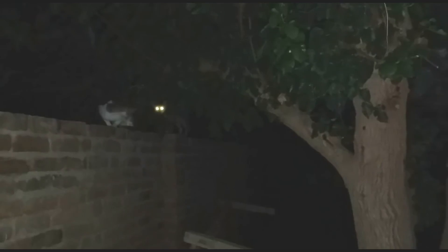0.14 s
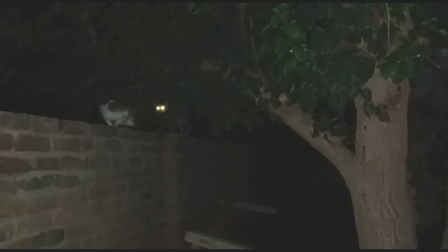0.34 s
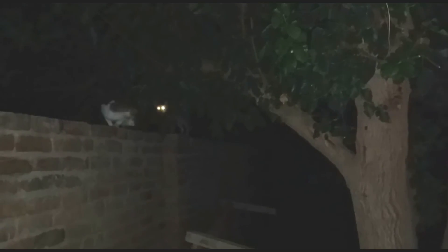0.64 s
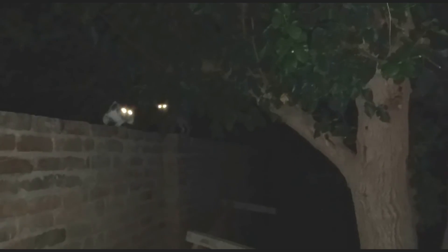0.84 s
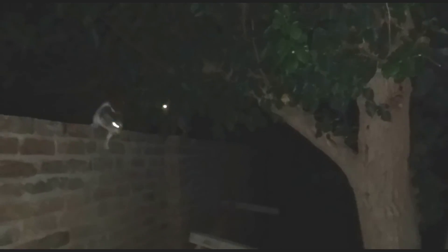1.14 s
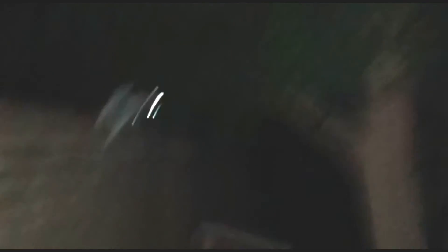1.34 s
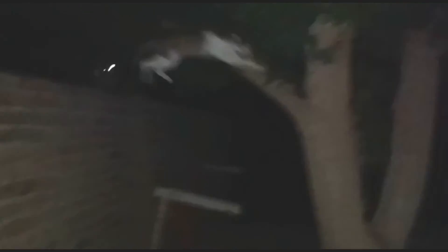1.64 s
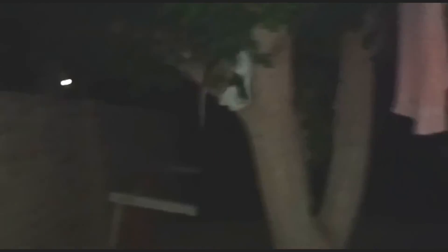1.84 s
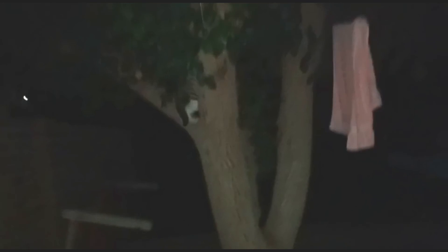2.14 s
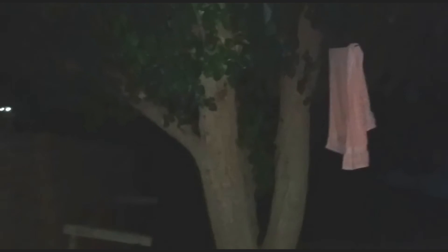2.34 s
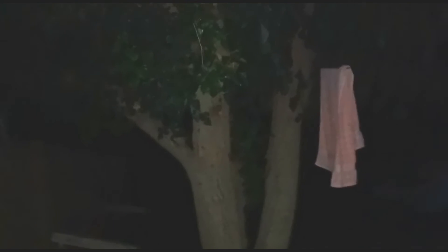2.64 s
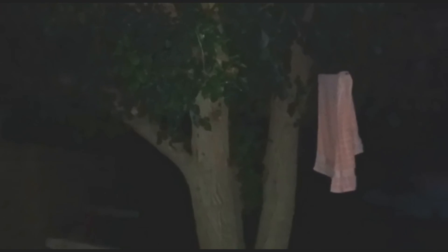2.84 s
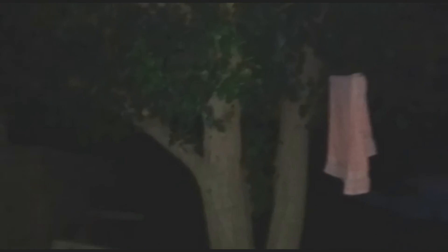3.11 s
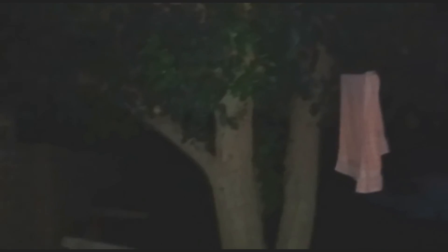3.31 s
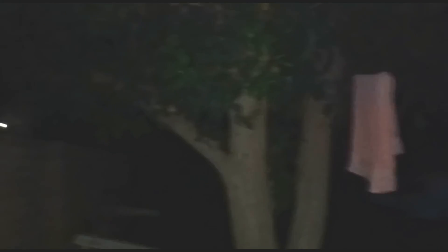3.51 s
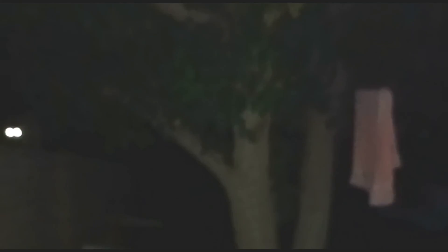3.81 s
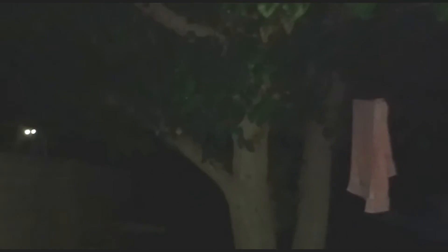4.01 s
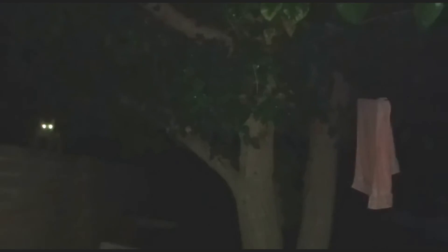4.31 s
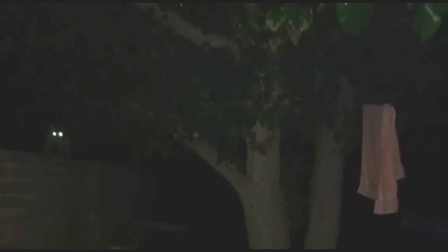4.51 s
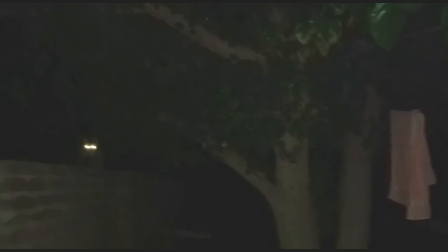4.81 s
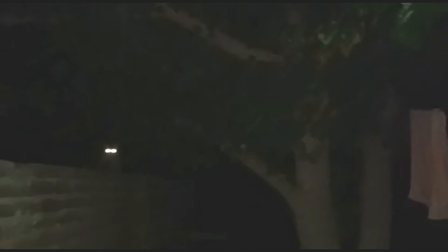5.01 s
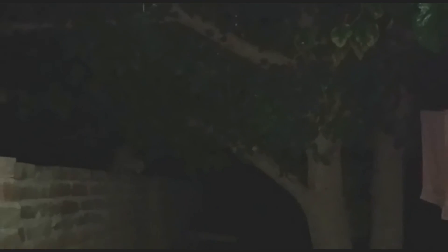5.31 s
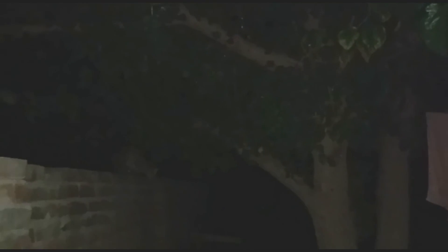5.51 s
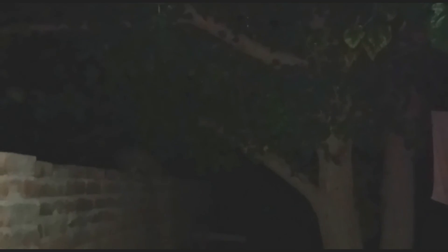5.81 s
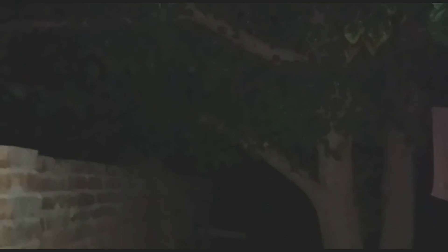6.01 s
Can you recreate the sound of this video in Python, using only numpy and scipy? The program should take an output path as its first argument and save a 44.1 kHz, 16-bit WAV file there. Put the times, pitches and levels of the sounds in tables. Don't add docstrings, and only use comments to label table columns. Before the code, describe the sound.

Handheld stereo outdoors: within the first second a cat's yowl slides upward and cracks into a raspy, piercing screech, with a short reflection off the walls. Soft woody thumps, scraping claws, leafy swishes and small snaps follow as the cat climbs a tree. Around three seconds a grunt swells into a snarling growl and fades. A wavering low hum, cricket chirps and distant howling dog continue behind.

```python
import sys
import numpy as np
from scipy import signal
from scipy.fft import rfft, irfft
from scipy.io import wavfile
from scipy.ndimage import uniform_filter1d, minimum_filter1d, map_coordinates

SR = 44100
rng = np.random.default_rng(int(sys.argv[2]) if len(sys.argv) > 2 else 0)


def dump_mix(stems):
    frames = np.atleast_2d(stems).T
    limited = np.clip(frames, -1, 1)
    pcm = np.round(limited * 32767).astype(np.int16)
    wavfile.write(sys.argv[1], SR, pcm)


def linear_from_db(decibels):
    return 10 ** (np.asarray(decibels, float) / 20)


N = 271215


def unit(x):
    return x / np.sqrt(np.mean(x ** 2) + 1e-20)


def along(points, hz):
    f, v = np.transpose(points)
    return np.interp(np.log(hz + 1), np.log(f + 1), v)


def curves(rows, t=None):
    s, *cols = np.transpose(rows)
    if t is None:
        t = np.arange(N) / SR
    return [np.interp(t, s, c) for c in cols]


def gate(rows, fade=0.0034):
    t = np.arange(N) / SR
    inside = np.minimum(t - rows[0][0], rows[-1][0] - t)
    return np.clip(inside / fade, 0, 1)


def swells(rows, rise, fall, floor_db=-120):
    t = np.arange(N) / SR
    power = linear_from_db(floor_db) ** 2
    for s, hold, db in rows:
        below = np.maximum(rise * (s - t), fall * (t - s - hold))
        power = power + linear_from_db(db - np.maximum(0, below)) ** 2
    return np.sqrt(power)


def wobble(rate):
    coarse = np.arange(0, N + 16, 16)
    knots = rng.standard_normal(int(N * rate / SR) + 4)
    return np.interp(np.arange(N), coarse, map_coordinates(knots, [coarse * rate / SR]))


def sides(pan_db):
    return linear_from_db(np.array([pan_db / 2, -pan_db / 2]))


def resonance(f, centre, width):
    return 1j * f * width / (centre ** 2 - f ** 2 + 1j * f * width)


def rush(spectrum, alike, patchy_db):
    hz, _, z = signal.stft(rng.standard_normal((2, N)), SR, nperseg=1024)
    field = uniform_filter1d(rng.standard_normal(z.shape[1:]), 8, axis=0)
    field = uniform_filter1d(field, 6, axis=1)
    turn = np.arccos(np.clip(along(alike, hz), -1, 1)) / 2
    shares = linear_from_db(along(spectrum, hz)) * [np.cos(turn), np.sin(turn)]
    z = z * linear_from_db(patchy_db * unit(field)) * shares[..., None]
    mid, side = signal.istft(z, nperseg=1024)[1][:, :N]
    return unit(np.array([mid + side, mid - side]))


# (time [s], pitch [Hz], effort [dB])
YOWL_PATH = [(0.28, 439, -39.5), (0.37, 594, -22.5), (0.44, 711, -21), (0.485, 850, -22.5),
             (0.505, 897, -14), (0.6, 1049, -19.5), (0.64, 1069, -13), (0.749, 1167, -20),
             (0.772, 1234, -15)]
# (frequency [Hz], level [dB])
THROAT_COLOUR = [(1500, -10), (2500, 4), (3000, -12), (4300, -24), (5000, -12), (5700, -5), (6600, -8),
                 (8000, -28)]


def yowl():
    pitch, second = curves(YOWL_PATH)
    khz_up = pitch / 1000 - 1
    first = second - 11 + 14.5 * khz_up
    third = second - 21 + 14 * khz_up + 2.5 * wobble(14.24)
    halfway = second + np.clip(-23 - 250 * (1140 - pitch) / 1000, -50, -23)
    levels = {1: first, 2: second, 2.5: halfway, 3: third}
    for k in range(4, 8):
        levels[k] = third + along(THROAT_COLOUR, k * pitch)
    phase = 2 * np.pi * np.cumsum(pitch + 9 * (700 / pitch) ** 2 * wobble(90)) / SR
    tone = 0
    for k, db in levels.items():
        tone = tone + linear_from_db(db + 3 + (1 + .5 * k) * wobble(35)) * np.sin(k * phase)
    return gate(YOWL_PATH) * tone


FOLD_TENSION = {"onset": [(850, 190, .4, 1800), (1500, 220, .35, 2200)], "screech": [(950, 400, 0.82, 2270),
                (1400, 414, 0.38, 2535), (1800, 455, 0, 2780)], "growl": [(950, 140, 0.3, 2450),
                (1500, 270, 0.37, 2510)]}
FOLD_UNSTEADINESS = {"onset": [(0, .07, .7), (1, .03, .6)], "screech": [(0, .011, .06), (.45, .015, .1),
                     (1, .04, .28)], "growl": [(0, .085, .4), (.3, .065, .6), (1, .035, .55)]}


def folds(call, kind, a, b):
    _, mouth, jaw = curves(call, np.arange(a, b) / SR)
    rate, weak, _ = curves(FOLD_TENSION[kind], mouth)
    jitter, breath = curves(FOLD_UNSTEADINESS[kind], jaw)
    cycle = np.cumsum(rate * (1 + .018 * wobble(40)[a:b])) / SR
    at = np.flatnonzero(np.diff(np.floor(cycle)))
    chance = rng.standard_normal((len(at), 2))
    alternate = 1 - weak[at] * (np.arange(len(at)) % 2)
    size = linear_from_db(30 * jitter[at] * chance[:, 0]) * alternate
    place = at + jitter[at] * chance[:, 1] * SR / rate[at]
    place = np.clip(place, 0, b - a - 1).astype(int)
    pulses = np.bincount(place, size * np.sqrt(SR / rate[at]), b - a)
    puffs = rng.standard_normal(b - a) * (3.6 + np.cos(np.pi * cycle) ** 2)
    breath = np.clip(breath, 0, 1)
    return np.sqrt(1 - breath) * unit(pulses) + np.sqrt(breath) * unit(puffs)


BARED_THROAT = {"onset": [(0, 400, -15, -39), (1, 650, -24, -30)], "screech": [(0, 486, -26, -35.5),
                (1, 950, -5, -17)], "growl": [(0, 258, -28.5, -33), (.3, 644, -22, -28), (1, 840, -5, -15)]}
RASP_RESONANCES = {"onset": [(2.02, 650, 5.5)], "growl": [(2.08, 600, 2.5), (3.1, 2430, -8)],
                   "screech": [(2.0, 600, 6.5), (2.45, 980, 3), (3.1, 2430, -20)]}


def throat(hz, mouth, jaw, kind, third_db):
    upper = curves(FOLD_TENSION[kind], mouth)[-1]
    width, upper_db, rasp_db = curves(BARED_THROAT[kind], jaw)
    f = hz[:, None]

    def even(h):
        return h / np.sqrt(np.mean(abs(h) ** 2, axis=0))

    edge = (.34 + .28 * jaw) * mouth
    low = even(resonance(f, mouth, 0.59 * width) ** 2 / (1 + (edge / (f + 1)) ** 10))
    third = resonance(f, 1.33 * upper, 630) ** 2 * (mouth / 1500) ** 3
    mid = even(resonance(f, upper, 920) ** 3 - linear_from_db(third_db) * third)
    high = even(sum(linear_from_db(db) * resonance(f, c * upper, 1.4 * w) ** 4 for c, w, db in RASP_RESONANCES[kind]))
    return low - linear_from_db(upper_db) * mid + linear_from_db(rasp_db) * high


def harsh(call, kind, third_db):
    a, b = round(call[0][0] * SR), round(call[-1][0] * SR)
    source = folds(call, kind, a, b)
    hz, frames, z = signal.stft(source, SR, nperseg=512, noverlap=448)
    level, mouth, jaw = curves(call, frames + np.arange(a, b)[0] / SR)
    shaped = z * linear_from_db(level) * throat(hz, mouth, jaw, kind, third_db)
    broken = uniform_filter1d(rng.standard_normal(z.shape), size=2, axis=0)
    broken = uniform_filter1d(broken, size=40, axis=1)
    torn = shaped * linear_from_db(4.2 * unit(broken))
    shaped = torn * np.linalg.norm(shaped, axis=0) / np.linalg.norm(torn, axis=0)
    voice = np.zeros(N)
    voice[a:b] = signal.istft(shaped, nperseg=512, noverlap=448)[1][:b - a]
    return voice * gate(call)


# (time [s], effort [dB], mouth resonance [Hz], jaw opening [0-1])
ONSET_CALL = [(0.25, -39, 850, 1), (0.29, -26.5, 850, .6), (0.424, -29.5, 1356, 0.2),
              (0.46, -21.5, 1500, 0)]
SCREECH_CALL = [(0.758, -20, 1750, 0.75), (0.8, -14.5, 1800, 0.93), (0.844, -8, 1697, .4),
                (0.95, -9.5, 1420, 0.5), (0.975, -10, 1421, 0.42), (1.068, -16, 1236, 0.8),
                (1.125, -11, 1121, 0.47), (1.19, -18, 954, 0.5), (1.272, -16, 940, 0.32)]
WHIMPER_CALL = [(1.288, -30.5, 1020, 0.25), (1.4, -32.5, 1020, 0.39), (1.43, -64, 1000, .3)]
GRUNT_CALL = [(2.77, -55, 1151, .5), (2.808, -24.5, 1180, 0.27), (2.9, -27.5, 1164, 0.25),
              (2.92, -17.5, 1367, 0.17), (3.075, -25.5, 1346, 0.18)]
HUFF_CALL = [(3.09, -19.5, 1130, 0.17), (3.14, -12.5, 1170, 0.023), (3.194, -9, 1224, 0.062),
             (3.215, -20, 1250, 0.18), (3.27, -16.5, 1400, .3)]
SNARL_CALL = [(3.295, -14, 1560, 0.94), (3.36, -17, 1520, 0.79), (3.45, -18, 1388, 0.98),
              (3.53, -8.5, 1553, 0.61), (3.56, -18, 1500, 0.69), (3.676, -20, 1080, .5),
              (3.78, -29, 1021, .45), (3.92, -36, 991, 0.25), (3.96, -54, 996, .3)]


def harsh_calls():
    onset = linear_from_db(-2.0) * harsh(ONSET_CALL, "onset", third_db=-17)
    screech = harsh(SCREECH_CALL + WHIMPER_CALL, "screech", third_db=-48)
    growl = harsh(GRUNT_CALL + HUFF_CALL + SNARL_CALL, "growl", third_db=-6.5)
    return onset + screech + growl


# (time [s], peak level
# [dB], frequency [Hz])
THUMPS = [(0.829, -22, 150), (1.02, -24, 145), (1.135, -31, 243), (1.186, -21, 230),
          (1.301, -19, 245.8), (1.359, -21, 229), (1.531, -28, 264), (1.898, -23.5, 243),
          (3.813, -24, 257)]


def thumps():
    hits, t = np.zeros((2, N + SR)), np.arange(SR // 8) / SR
    for s, db, hz in THUMPS:
        envelope = linear_from_db(db - 60 * t / 0.12) * (1 - np.exp(-t / 0.0097))
        hits[:, round(s * SR):][:, :len(t)] += envelope * np.sin(2 * np.pi * hz * t)
    return hits[:, :N]


# (time [s], hold [s], level [dB])
LEAF_FLURRIES = [(.8, 0.17, -49), (1.16, 0.048, -47.5), (1.85, 0.019, -44.5), (2.09, 0.027, -55),
                 (2.2, .14, -44), (2.4, .07, -41), (2.5, .07, -46.5), (2.86, .02, -47), (3.18, .02, -50.5),
                 (3.34, 0.15, -49.5), (3.6, 0.029, -45.5), (3.72, 0.096, -51), (3.98, .015, -44)]
# (frequency [Hz], level [dB per Hz])
LEAF_HISS = [(1760, -17), (3000, -12), (3590, -0.5), (4240, -7), (4940, 3), (7440, -6), (12800, -2),
             (15700, -8.5)]


def leaves():
    flutter = linear_from_db(2.0 * wobble(40) + 0.87 * wobble(300))
    hiss = unit(flutter * rush(LEAF_HISS, [(1000, 0.079)], patchy_db=-1.5))
    shaking = swells(LEAF_FLURRIES, rise=162, fall=124, floor_db=-55.5)
    return shaking * linear_from_db(4.5) * sides(-2.3)[:, None] * hiss


# (time [s], hold [s], level [dB])
CLAW_SCRAPES = [
    (1.42, 0, -58),
    (1.534, 0, -45),
    (1.85, 0.022, -33),
    (2.2, 0.11, -33),
    (2.35, 0.16, -35),
]
# (frequency [Hz], level [dB per Hz])
BARK_SCRAPE = [(380, -34), (650, -13), (974, -7.5), (1060, -5), (1370, -13), (1940, -12.5), (2840, -21),
               (4500, -23.5), (5850, -37), (9900, -120)]


def claws():
    scrape = unit(linear_from_db(0.92 * wobble(60)) * rush(BARK_SCRAPE, [(1000, 0.5)], patchy_db=3.0))
    return swells(CLAW_SCRAPES, rise=255, fall=170) * scrape


# (time [s], peak level [dB])
TWIG_SNAPS = [(1.1742, -35), (1.48, -42), (1.6013, -40), (1.7988, -34), (2.1061, -38), (2.846, -35),
              (3.1547, -37), (3.7963, -40), (3.98, -36)]


def twigs():
    hits, t = np.zeros((2, N + SR)), np.arange(SR // 8) / SR
    for s, db in TWIG_SNAPS:
        burst = np.diff(rng.standard_normal((2, len(t) + 1)))
        hits[:, round(s * SR):][:, :len(t)] += linear_from_db(db - 7 - 60 * t / .03) * burst
    return hits[:, :N]


# (time [s], level [dB], left-right difference [dB])
MAIN_TONE = [(0.0, -25, 0), (0.74, -26.5, 0), (1.13, -30.5, 0), (1.51, -28.5, -1), (2.33, -30, 0.5),
             (3.07, -28.5, 3), (3.6, -24, -0.5), (3.7, -28.5, 1), (4.68, -23, -2.5), (5.05, -22, -5),
             (5.33, -28, -9.5), (6.06, -31.5, -4.5), (6.15, -32, -6)]
# (time [s], hold [s], level [dB])
LOWER_TONE_SWELLS = [(0.4, 0, -38), (2.96, 0, -32)]
# (frequency [Hz], level [dB], start [s], end [s])
CASING_TONES = [(144.5, -46.5, 6, 6), (1460, -43, -0.5, 0.093), (216.4, -54, 2, 7), (250.7, -50.5, 3, 7),
                (299.7, -46.5, 1.5, 7), (356.8, -42, 1.5, 7), (377, -38, 7.5, 7), (463.3, -47, 1, 7),
                (504, -42.5, 3.5, 4.58), (535.2, -44.5, 0.5, 7), (552.4, -40.5, 5, 7), (950, -50.5, 2.5, 7),
                (1498, -56, -5, 7)]
# (time [s], left lag [samples])
CAMERA_TURN = [(0, -8.5), (3.7, -5.5), (4.1, 9.5), (6.15, 2.5)]


def machine():
    main_db, pan = curves(MAIN_TONE)
    lag = curves(CAMERA_TURN)[0] / SR
    t = np.arange(N) / SR + lag * np.array([[-.5], [.5]])
    main = linear_from_db(main_db + 4 + 1.1 * wobble(4.3)) * np.sin(2 * np.pi * 340.1 * t + 0.4 * wobble(3))
    lower_gain = swells(LOWER_TONE_SWELLS, rise=6.5, fall=6.5, floor_db=-44.5) * linear_from_db(3 + .8 * wobble(4))
    lower = lower_gain * np.sin(2 * np.pi * 318.3 * t + .4 * wobble(2.5))
    casing = 0
    for f, db, a, b in CASING_TONES:
        gain = gate([[a - .2], [b + 0.16]], 0.17) * linear_from_db(db + 4.5 + 0.92 * wobble(4.6))
        casing = casing + gain * np.sin(2 * np.pi * f * t + 1.03 * wobble(4))
    return (main + lower) * sides(pan) + casing


# (start [s], end [s], chirp spacing [s], level [dB])
CRICKET_BOUTS = [(0.057, .78, .0962, -39), (0.835, 1.06, 0.092, -41), (2.623, 3.2, 0.11, -41.5),
                 (3.351, 4.83, .1022, -43), (4.897, 6.14, .1004, -40.5)]


def cricket():
    song, t = np.zeros((2, N + SR)), np.arange(-SR // 100, SR // 100) / SR
    chirps = [(s, db) for a, b, spacing, db in CRICKET_BOUTS for s in np.arange(a, b, spacing)]
    for s, db in chirps:
        for k, stroke_db in enumerate([-6.5, -1.6, -8, -13.5, -14.5]):
            u = rng.standard_normal(4)
            glide = 2 * np.pi * ((7350 + 90 * u[0]) * t - 45000 * t * t)
            ring = np.exp(-(t / 0.0055) ** 2) * np.sin(glide + [[0], [1.0 * u[1]]])
            start = round((s + .0168 * k + .0006 * u[2]) * SR) - SR // 100
            song[:, start:][:, :len(t)] += linear_from_db(db + 3.5 + stroke_db + 0.46 * u[3]) * ring
    return song[:, :N]


# (time [s], pitch [Hz], level [dB])
FAR_HOWLS = [
    [(0.0, 491, -37), (0.016, 482, -30), (0.5, 391.4, -37.5)],
    [(0.85, 405, -55), (0.884, 436, -30), (1.1, 365, -41)],
    [(5.52, 364.3, -34), (5.69, 445.2, -26.5), (5.836, 480, -29.5), (6.15, 511.5, -31.5)],
]


def howls():
    far = 0
    for call in FAR_HOWLS:
        pitch, db = curves(call)
        phase = 2 * np.pi * np.cumsum(pitch) / SR
        tone = np.sin(phase) + 0.13 * np.sin(2 * phase)
        far = far + gate(call, 0.037) * linear_from_db(db - 2 + 3.3 * wobble(52)) * tone
    return far


# (time [s], half length [s], change [dB])
MURMUR_LULLS = [(1.9, 0.71, -5), (4.6, 0.34, -3)]
# (frequency [Hz], level [dB per Hz])
NIGHT_AIR = [(120, -11.5), (200, -9), (300, 2), (520, 3.5), (680, -7), (1000, -1.5), (1300, -6),
             (2500, -10.5), (4000, -19), (6300, -24.5), (7400, -18), (9000, -29), (15800, -60)]
# (frequency [Hz], left-right likeness [-1 to 1])
LIKENESS = [(60, 0.94), (240, 0.97), (950, -0.028), (3770, -0.092), (15000, -0.29)]


def murmur():
    t = np.arange(N) / SR
    lull_db = sum(db * np.exp(-((t - s) / half) ** 2) for s, half, db in MURMUR_LULLS)
    return linear_from_db(-33.5 + lull_db + 0.14 * wobble(6.0)) * rush(NIGHT_AIR, LIKENESS, patchy_db=1.86)


# (time [s], hold [s], level [dB])
CAMERA_HANDS = [
    (.8, .05, -42.5),
    (1.05, 0.32, -40),
    (1.75, 0.14, -47.5),
]
# (frequency [Hz], level [dB per Hz])
DEEP_RUMBLE = [(15, -61), (25, -29), (46, -18), (103, -8), (184, -9), (230, 0.5), (300, -27), (510, -120)]


def rumble():
    noise = rush(DEEP_RUMBLE + [(400, -63)], [(30, .5), (150, 0.79)], patchy_db=3.0)
    return swells(CAMERA_HANDS, rise=100, fall=27, floor_db=-48) * linear_from_db(-3.0) * noise


# (frequency [Hz], time to fall 60 dB [s])
YARD_DECAY = [(300, 0.17), (2000, 0.26), (5500, 0.32), (10000, 0.089)]


def yard(x):
    hz, t, z = signal.stft(rng.standard_normal((2, SR // 2)), SR, nperseg=256)
    tail = signal.istft(z * linear_from_db(-60 * t / along(YARD_DECAY, hz)[:, None]), SR, nperseg=256)[1]
    late = np.pad(x, ((0, 0), (300, 0)))
    return signal.fftconvolve(late, tail / np.linalg.norm(tail[0]), axes=1)[:, :N]


def scene():
    voices = yowl() + harsh_calls()
    cats = np.array([np.roll(voices, -3), voices]) * sides(-1.2)[:, None]
    tree = thumps() + leaves() + claws() + twigs()
    chirps = cricket()
    answer = linear_from_db(-6.5) * yard(cats) + linear_from_db(-3.5) * yard(chirps)
    return cats + chirps + answer + tree + machine() + howls() + murmur() + rumble()


def band_limit(x):
    return signal.sosfilt(signal.butter(12, 15880, fs=SR, output="sos"), x)


def record(dry):
    hz = np.fft.rfftfreq(N, 1 / SR)
    band = (hz < 15620) / np.sqrt(1 + (58 / (hz + 1)) ** 8)
    heard = irfft(rfft(dry) * band, N)
    needed = np.minimum(1, .97 / (abs(heard).max(axis=0) + 1e-9))
    gain = uniform_filter1d(minimum_filter1d(needed, size=200), size=200)
    return band_limit(heard * gain)


dry = scene()
out = record(dry)
dump_mix(out)
```